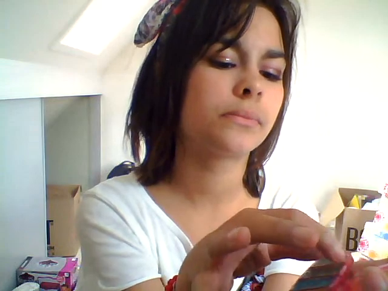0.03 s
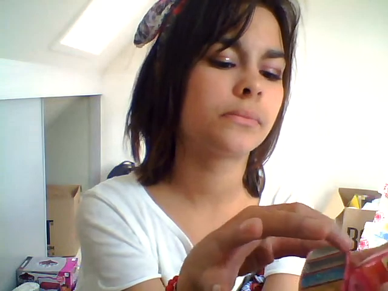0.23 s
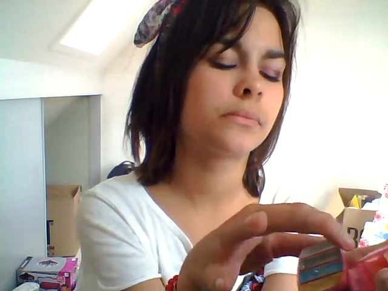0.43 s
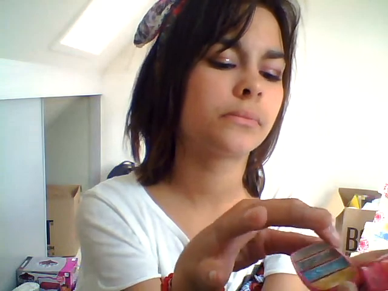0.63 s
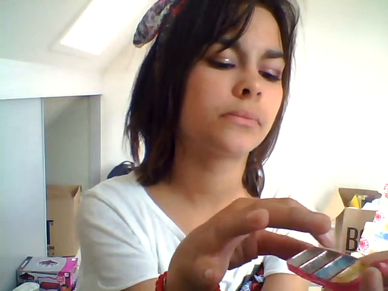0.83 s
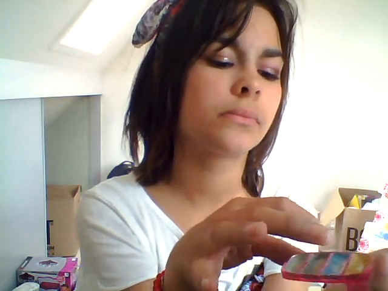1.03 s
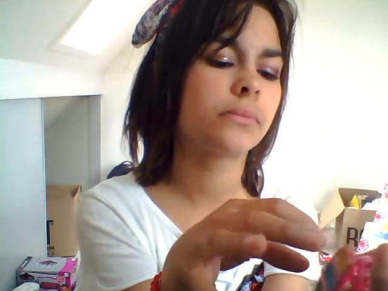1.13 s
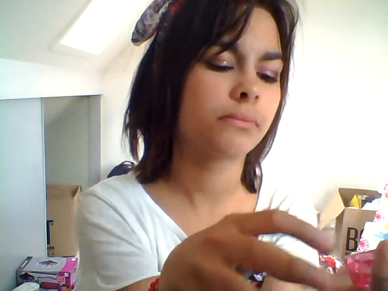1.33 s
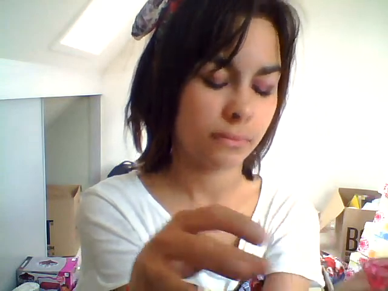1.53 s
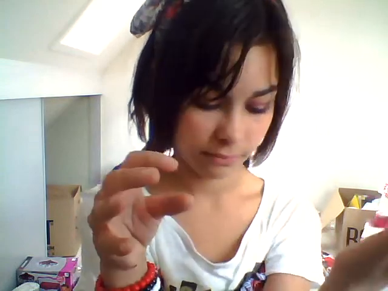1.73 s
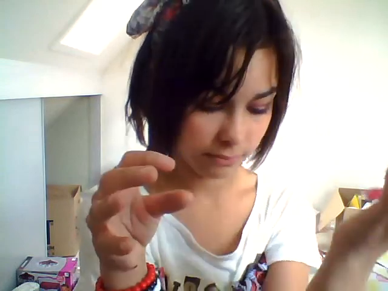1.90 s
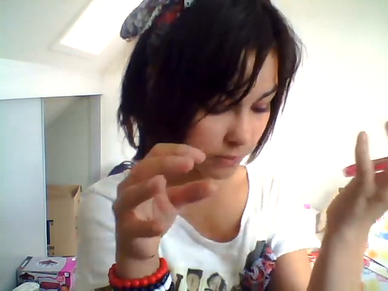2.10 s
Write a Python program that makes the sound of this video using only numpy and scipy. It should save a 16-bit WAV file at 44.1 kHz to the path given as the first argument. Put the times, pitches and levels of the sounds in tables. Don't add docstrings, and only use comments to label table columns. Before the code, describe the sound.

Plastic case latch snaps, followed by a loud brief clatter as its tray falls and bounces

```python
import sys
import numpy as np
from scipy import signal
from scipy.io import wavfile
from scipy.ndimage import uniform_filter1d

SR = 44100
rng = np.random.default_rng(int(sys.argv[2]) if len(sys.argv) > 2 else 0)


def store_wav(level_fs):
    pcm = np.round(np.clip(np.atleast_2d(level_fs), -1, 1) * 32767)
    wavfile.write(sys.argv[1], SR, pcm.T.astype(np.int16))


def ratio_of_db(decibels):
    return 10 ** (np.asarray(decibels, float) / 20)


N = 95300


def evened(x):
    return x / np.sqrt(np.mean(x ** 2) + 1e-20)


def read(points, hz):
    f, value = np.transpose(points)
    return np.interp(np.log(hz + 1), np.log(f + 1), value)


def causal(points, size=4096):
    log_gain = np.log(ratio_of_db(read(points, abs(np.fft.fftfreq(size, 1 / SR)))))
    return np.fft.ifft(np.exp(np.conj(signal.hilbert(log_gain)))).real[:size // 2]


def preamp_hiss():
    # hz, level_db_per_hz
    spectrum = [(18, -32), (30, -7), (71, -8), (207, -11), (1080, -21.5), (1220, -23.5), (1310, -25),
                (5540, -39), (7860, -47), (10200, -77), (17300, -120)]
    level_db, edge_hz, edge_db, patch_db = -61.5, 8010, -44.5, 1.0
    frames, hz = N // 256 + 5, np.fft.rfftfreq(1024, 1 / SR)
    a, b, patches = rng.standard_normal((frames, 513, 3)).T
    patches = uniform_filter1d(patches, 12, 0)
    patches = evened(uniform_filter1d(patches, 10, 1))
    shape_db = np.maximum(read(spectrum, hz), read(spectrum, 11000)) + edge_db * (hz > edge_hz)
    gain = ratio_of_db(shape_db[:, None] + patch_db * patches) * (hz > 25)[:, None]
    noise = signal.istft((a + 1j * b) * gain, nperseg=1024, noverlap=768)[1][:N]
    return ratio_of_db(level_db) * evened(noise)


def air_drift():
    # time_s, level_db
    drift_level = [(0, -56.5), (.7, -61), (.9, -55.5), (1.05, -48), (1.3, -56.5), (1.6, -53.5),
                   (2.16, -60.5)]
    t = np.arange(N) / SR
    drift = np.zeros(N)
    for hz in np.geomspace(1.8, 54, 16):
        drift += np.sin(2 * np.pi * (hz * t + rng.random())) / np.sqrt(hz)
    return ratio_of_db(np.interp(t, *np.transpose(drift_level))) * evened(drift)


def whine():
    whine_hz, whine_db = 1183, -77.5
    return ratio_of_db(whine_db) * np.sin(2 * np.pi * whine_hz * np.arange(N) / SR)


def ringing(modes, tilt_db, ring_share, chance, t):
    scatter_db, detune_share = 1.5, 0.006
    hz, db, t60_s = np.transpose(modes)[:, :, None]
    level_chance, pitch_chance, phase = chance
    level = ratio_of_db(db + tilt_db * np.log2(hz / 2500) + scatter_db * level_chance)
    decay = ratio_of_db(-60 * t / (t60_s * ring_share))
    tones = level * decay * np.sin(2 * np.pi * hz * (1 + detune_share * pitch_chance) * t + phase)
    return tones.sum(0) / np.sqrt((level ** 2).sum() / 2)


def broad_snap(tilt_db, ring_share, low_edge_hz, grit, t):
    t60_s, pivot_hz, tick_share = 0.011, 2500, 0.45
    edge_db = tilt_db * np.log2(low_edge_hz / pivot_hz)
    top_db = tilt_db * np.log2(8000 / pivot_hz)
    colour = causal([(low_edge_hz / 4, edge_db - 31), (low_edge_hz, edge_db), (8000, top_db), (12000, -30)])
    scrape = grit * ratio_of_db(-60 * t / (t60_s * ring_share))
    scrape = np.sqrt(1 - tick_share) * scrape / np.linalg.norm(scrape)
    tick = np.sqrt(tick_share) * (t == t[8])
    energy = SR * t60_s * ring_share / (2 * np.log(1000))
    crack = np.sqrt(energy) * (scrape + tick)
    return signal.fftconvolve(crack, colour / np.linalg.norm(colour))[:len(t)]


def strikes(contacts, modes, crack_db=-40, low_edge_hz=500):
    out, t = np.zeros(N + SR), np.arange(SR // 5) / SR
    chance = rng.standard_normal((len(contacts), 3, len(modes), 1))
    grit = rng.standard_normal((len(contacts), len(t)))
    onset = 1 - np.exp(-t / 0.0002)
    for (start_s, level_db, tilt_db, ring_share), spot, noise in zip(contacts, chance, grit):
        sound = ringing(modes, tilt_db, ring_share, spot, t)
        sound = sound + ratio_of_db(crack_db) * broad_snap(tilt_db, ring_share, low_edge_hz, noise, t)
        out[round(start_s * SR):][:len(t)] += ratio_of_db(level_db) * sound * onset
    return out[:N]


def desk_knocks():
    # start_s, level_db, tilt_db_per_octave, ring_share
    knocks = [
        (1.5400, -16.5, 0, 0.69),
        (1.5495, -29, -6.5, 0.91),
        (1.5680, -13, 8, 0.39),
        (1.7510, -31.5, -7, 0.28),
        (1.7595, -42, 13, 0.68),
    ]
    # pitch_hz, level_db, t60_s
    modes = [(123.2, -19, .12), (260, -10.5, 0.12), (400, -3, 0.045), (449.4, 3.5, 0.085), (623, -4, 0.066),
             (1021, -4, 0.051), (1185, 3, 0.073)]
    return strikes(knocks, modes)


def latch_clicks():
    # start_s, level_db, tilt_db_per_octave, ring_share
    clicks = [
        (1.2226, -48, -5, 1),
        (1.2413, -15.5, -4, 0.47),
        (1.2450, -30.5, 3, 1.2),
        (1.2484, -22.5, -13.5, 0.39),
        (1.2582, -19, 2.5, 0.87),
        (1.2640, -34.5, 8, 0.76),
    ]
    # pitch_hz, level_db, t60_s
    modes = [(1724, 3, 0.011), (2150, -8, 0.028), (3200, -9.5, .012), (4270, -4, 0.02), (4950, -8, .012),
             (5650, -19, 0.0039), (6111, -26, 0.0099), (7150, -19.5, 0.019)]
    return strikes(clicks, modes, crack_db=2, low_edge_hz=1890)


def piece_bounces():
    # start_s, level_db, tilt_db_per_octave, ring_share
    bounces = [(1.6610, -25.5, 2.5, 0.54), (1.6633, -27, -1.5, .6), (1.6667, -27.5, -5.5, 1),
               (1.6877, -31, 1, 0.66), (1.6937, -28.5, 0.5, 0.96), (1.6965, -31, -9, 1.25),
               (1.7117, -41, -10, 1), (1.7163, -37.5, -5.5, 2.6), (1.7215, -47, 0, 0.87),
               (1.7417, -21.5, -2, 1), (1.7466, -35.5, -2.5, 0.94), (1.7660, -38, -3, 2.7),
               (1.8121, -46, -3, 1.2), (1.8352, -46, 8, 1.93), (1.8386, -47, 0, 2.14), (1.8500, -49, -4, 1),
               (1.8670, -48, 2, 1)]
    # pitch_hz, level_db, t60_s
    modes = [(500, -7.5, 0.0146), (926, -11, 0.025), (1543, 4.5, 0.02), (2150, 9, 0.01),
             (3200, -10, 0.0067), (4170, -5, .008), (4630, 5.5, .008), (6040, -2, .008),
             (7580, -1.5, 0.0078)]
    return strikes(bounces, modes, crack_db=4.24, low_edge_hz=1110)


def tray_hits():
    # start_s, level_db, tilt_db_per_octave, ring_share
    hits = [(1.5379, 1.5, 0.5, 0.55), (1.5398, 0.5, 3.5, 1), (1.5420, -10, -4.5, 0.55),
            (1.5432, -12.5, -2, 0.74), (1.5448, -11, 2, 0.43), (1.5498, -19, -21, 0.71),
            (1.5592, -14, 0, .7), (1.5638, -16, 0, 0.62), (1.5685, -14, -4.5, 0.57),
            (1.5721, -9.5, 3.5, 0.9), (1.5770, -16, -1, 0.42)]
    # pitch_hz, level_db, t60_s
    modes = [(456.5, -4, 0.044), (1079, -10, .035), (1157, -4.5, 0.029), (1663, -6.5, .02), (1830, 1, .02),
             (2465, -3.5, .02), (3367, -3.5, 0.016), (3919, -7, .02), (4160, -14, 0.015),
             (4777, -10.5, 0.048), (5066, -4, 0.029), (5452, -5.5, 0.0354), (6094, -3.5, 0.017),
             (6880, -2, 0.0099)]
    return strikes(hits, modes, crack_db=0.58, low_edge_hz=980)


def room(x):
    near_db, near_t60_s = -8, 0.069
    far_db, far_delay_s, far_rise_s = -9, 0.014, 0.004
    # hz, t60_s
    wall_t60 = [(150, 0.16), (500, .32), (1500, 0.35), (4000, 0.22), (7000, .27)]
    # hz, level_db
    wall_colour = [(150, 2), (500, -3.5), (1000, -1), (1600, -6), (2600, -1.5), (4000, 4.5), (6000, -1.5),
                   (7000, -1)]
    size = SR // 2
    taps, t = np.zeros((2, size)), np.arange(size) / SR
    at = np.arange(40, size - 12, 12) + rng.integers(0, 12, (2, (size - 41) // 12))
    np.put_along_axis(taps, at, rng.choice([-1., 1.], at.shape), 1)
    near = taps[0] * ratio_of_db(-60 * t / near_t60_s)
    hz, when_s, z = signal.stft(taps[1], SR, nperseg=256)
    band_db = read(wall_colour, hz)[:, None] - 60 * when_s / read(wall_t60, hz)[:, None]
    far = signal.istft(z * ratio_of_db(band_db), SR, nperseg=256)[1][:size]
    far = far * (1 - np.exp(-np.maximum(t - far_delay_s, 0) / far_rise_s))
    tail = ratio_of_db(near_db) * near / np.linalg.norm(near) + ratio_of_db(far_db) * far / np.linalg.norm(far)
    return signal.fftconvolve(x, tail)[:N]


def scene():
    hits = desk_knocks() + latch_clicks() + piece_bounces() + tray_hits()
    return (hits + room(hits))[None]


def microphone(x):
    # hz, level_db
    response = [(20, -36), (100, -5), (300, -1.5), (6900, -1.5), (7400, -14.5), (8000, -17.5), (8900, -28),
                (9500, -77)]
    return signal.fftconvolve(x, causal(response))[:N]


def suppress(x):
    threshold_db, tilt_db, smooth_s = -55, -2.5, 0.011
    slope, floor_db = 1.6, -16
    hz, _, z = signal.stft(x, SR, nperseg=256, noverlap=192)
    now = uniform_filter1d(abs(z) ** 2, size=15, axis=0).clip(0)
    keep = np.exp(-64 / (smooth_s * SR))
    power = signal.lfilter([1 - keep], [1, -keep], now) + now / 2
    noise_db = threshold_db + tilt_db * np.log2((hz[:, None] + 200) / 2000)
    over_db = 10 * np.log10(power + 1e-14) - noise_db
    gain = ratio_of_db(np.clip(slope * over_db, floor_db, 0))
    return signal.istft(z * gain, SR, nperseg=256, noverlap=192)[1][:N]


def overload(x):
    ceiling, smooth_hz = 0.93, 11500
    return signal.lfilter(*signal.butter(4, smooth_hz, fs=SR), np.clip(x, -ceiling, ceiling))


def band_limit(x):
    return signal.sosfilt(signal.butter(12, 9300, fs=SR, output="sos"), x)


def record(dry):
    x = overload(suppress(microphone(dry[0])))
    mix = x + preamp_hiss() + air_drift() + whine()
    return band_limit(mix[None])


dry = scene()
out = record(dry)
store_wav(out)
```